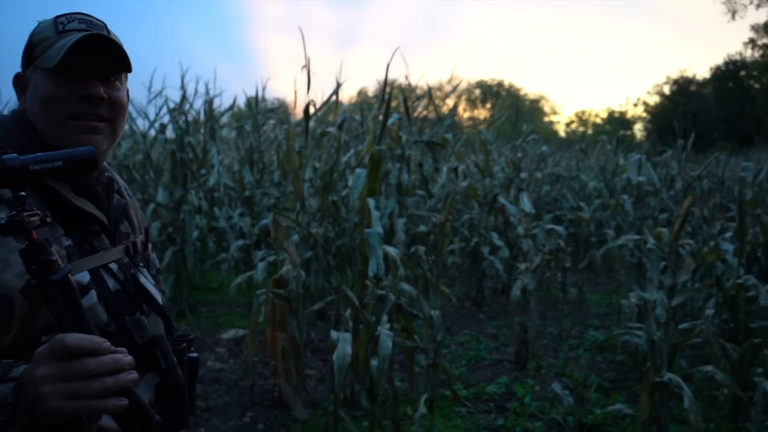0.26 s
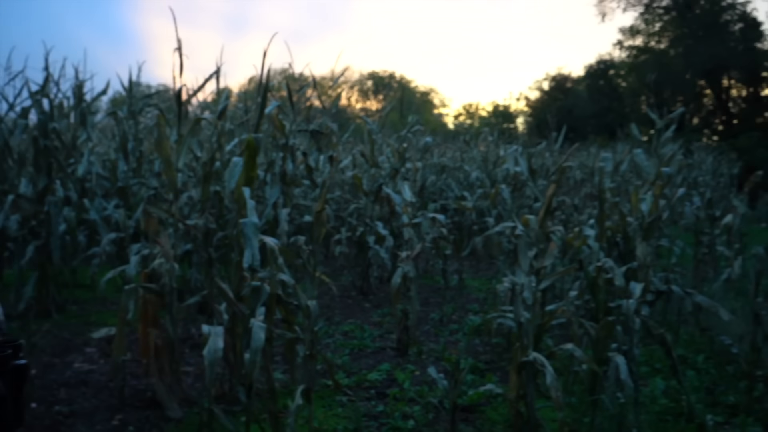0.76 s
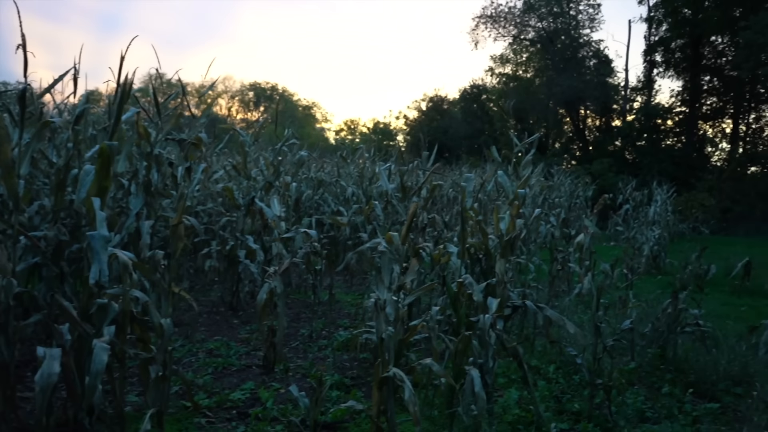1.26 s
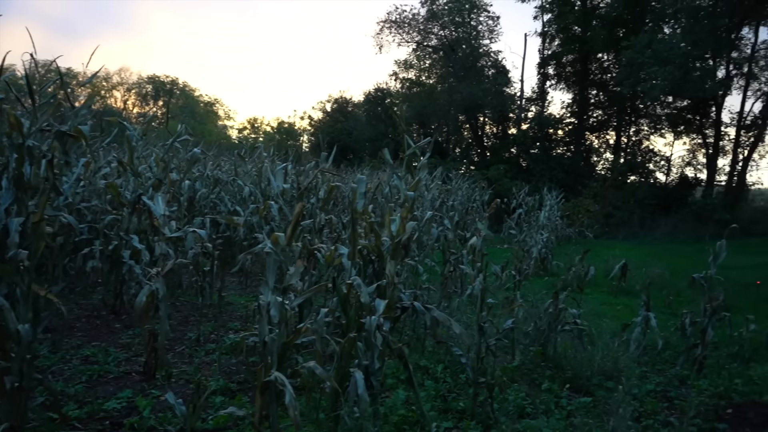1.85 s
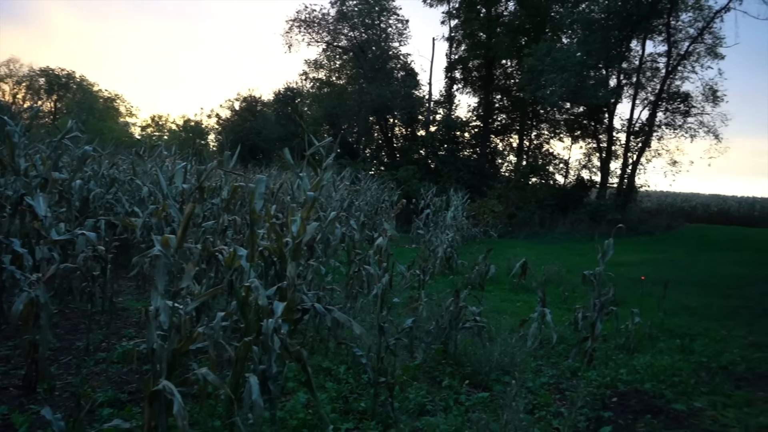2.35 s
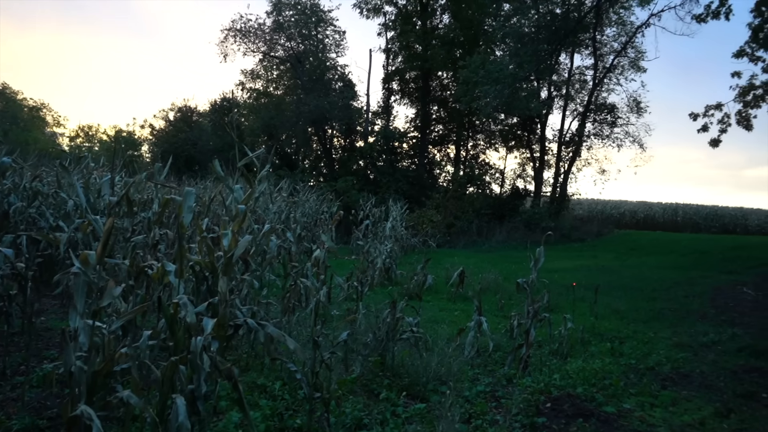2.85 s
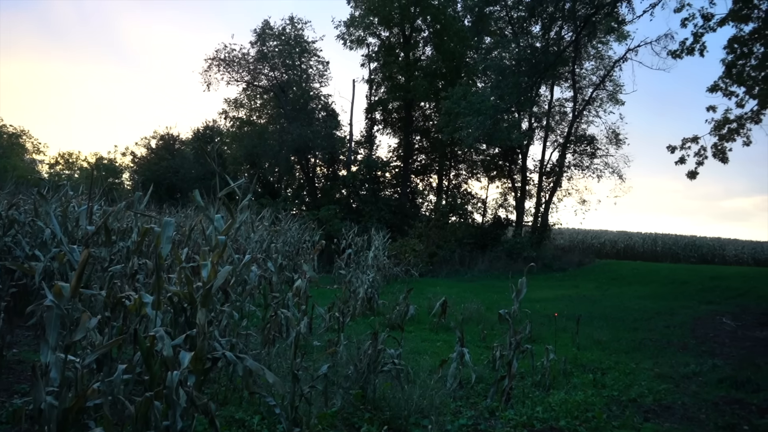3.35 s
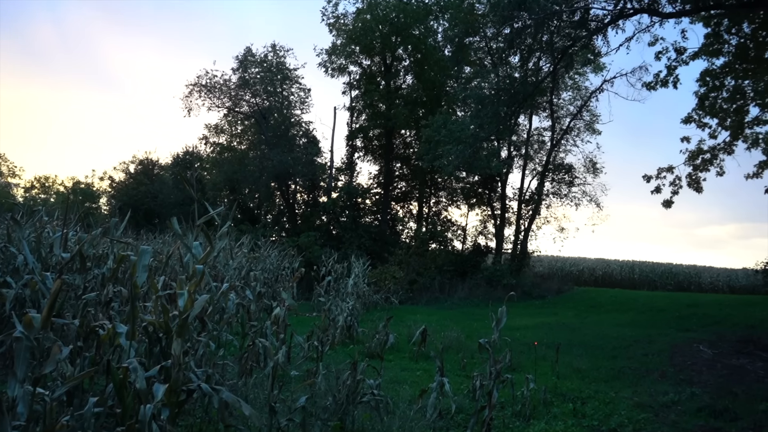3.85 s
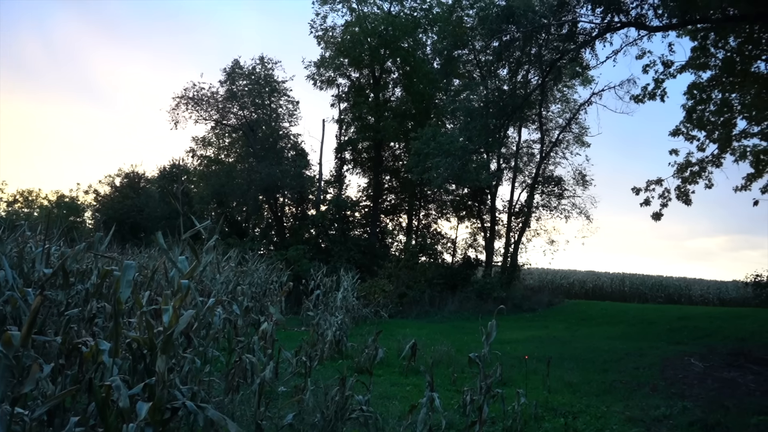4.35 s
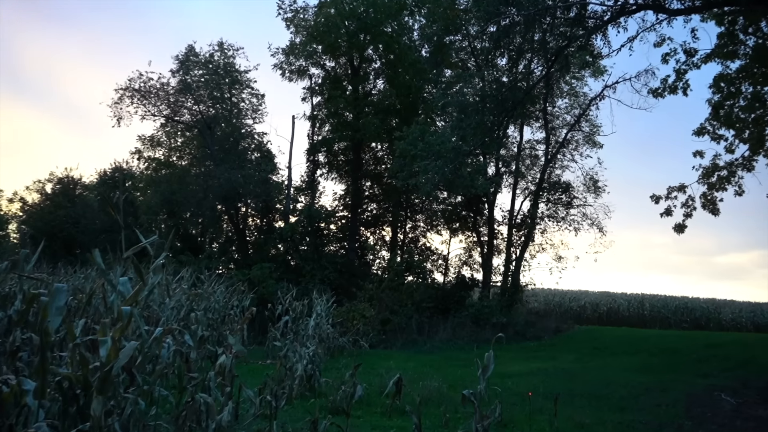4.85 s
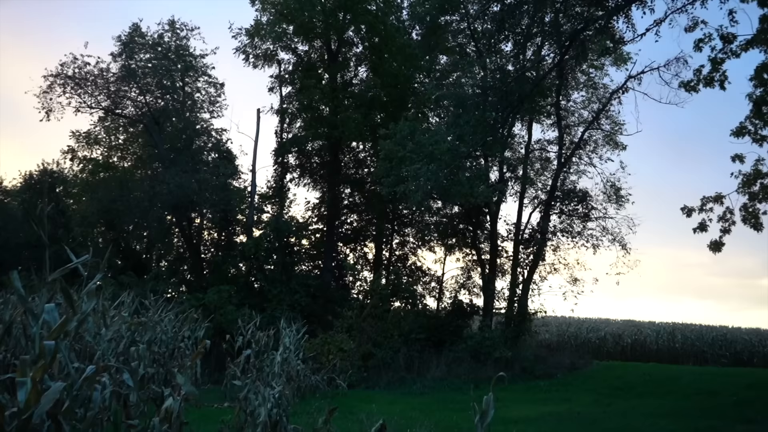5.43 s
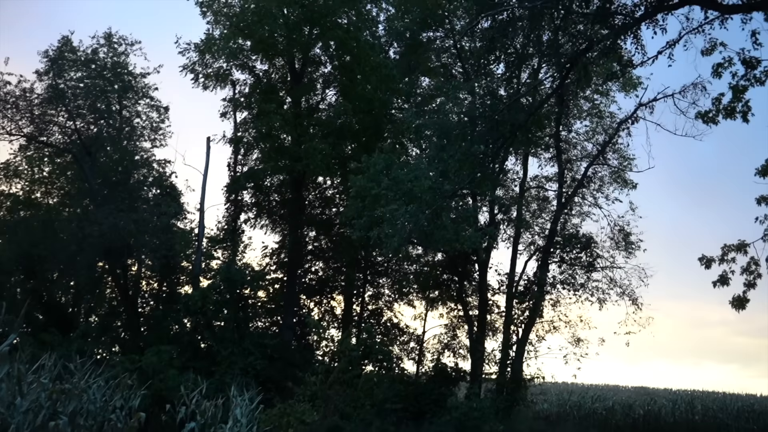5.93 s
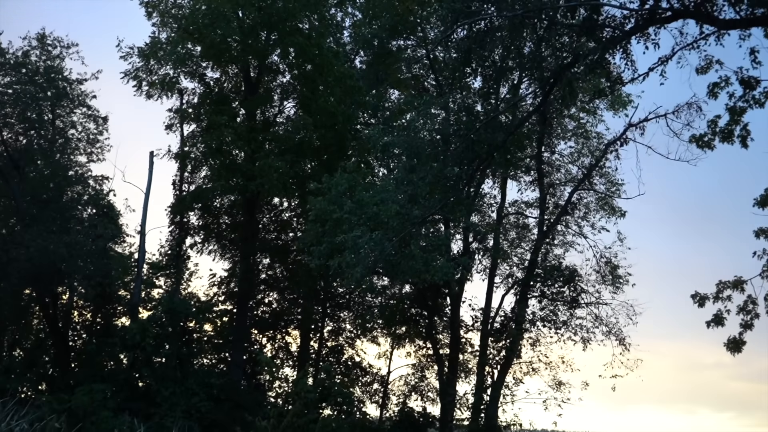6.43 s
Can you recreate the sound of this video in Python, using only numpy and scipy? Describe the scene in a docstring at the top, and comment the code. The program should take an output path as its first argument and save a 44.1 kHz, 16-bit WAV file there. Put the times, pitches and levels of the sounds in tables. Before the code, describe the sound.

Tree crickets trill steadily over an open-field hush while dry corn leaves crackle and a hand rubs and softly knocks the camera.

```python
"""The edge of a dry cornfield at dusk, heard at one microphone on a hand-held camera.
Near tree crickets trill together over a far chorus, one short falling tone per wing stroke.
Underneath lie the wash of open land, a far road and a machine hum, all shaped from noise.
At the microphone the hand sways, rubs and softly knocks the camera; carried gear taps twice.
Dry leaves crackle and snap in bursts of filtered noise; a bird calls thinly in gliding sines."""
import sys
import numpy as np
from scipy import signal
from scipy.fft import rfft, irfft
from scipy.io import wavfile
from scipy.ndimage import uniform_filter1d

SR = 44100
rng = np.random.default_rng(int(sys.argv[2]) if len(sys.argv) > 2 else 0)


def bounce(signal):
    """Save signal as a 16-bit WAV file at the path given by the first command-line argument."""
    frames = np.transpose(np.atleast_2d(signal))
    limited = np.clip(frames, -1, 1)
    pcm = np.round(limited * 32767).astype(np.int16)
    wavfile.write(sys.argv[1], SR, pcm)


N = 294940
T = np.arange(N) / SR  # time [s]


def undb(db):
    """Decibels to amplitude gain."""
    return 10 ** (np.asarray(db) / 20)


def unit(x):
    """Scale to rms 1."""
    return x / np.sqrt(np.mean(x ** 2) + 1e-20)


def frequencies(x):
    """Frequencies [Hz] of the real spectrum of x."""
    return np.arange(len(x) // 2 + 1) * SR / len(x)


def colour(x, points):
    """Filter by a spectrum of (frequency [Hz], level [dB]) that falls away beyond both ends; rms 1."""
    hz, db = np.transpose(points)
    f = frequencies(x)
    gain = undb(np.interp(np.log(f + 1), np.log(hz), db))
    low_skirt = np.minimum(f / hz[0], 1) ** 2
    high_skirt = np.maximum(f / hz[-1], 1) ** 2
    return unit(irfft(rfft(x) * gain * low_skirt / high_skirt, len(x)))


def band(x, hz, octaves):
    """One broad resonance, bell-shaped on the octave scale; rms 1."""
    distance = np.log2((frequencies(x) + 1) / hz) / octaves
    return unit(irfft(rfft(x) / (1 + (distance / 2) ** 2) ** 4, len(x)))


def noise():
    """White noise for the whole scene."""
    return rng.standard_normal(N)


def walk(rate):
    """Slow random wander: levels held for 1 / rate seconds, then smoothed twice over that time."""
    hold = max(int(SR / rate), 1)
    steps = np.repeat(rng.standard_normal(N // hold + 1), hold)
    smooth = uniform_filter1d(uniform_filter1d(steps, hold), hold)
    return 1.3 * smooth[:N]


def tone(hz):
    """A sine of rms 1 that follows a pitch curve [Hz]."""
    return np.sqrt(2) * np.sin(2 * np.pi * np.cumsum(hz) / SR)


def add(out, s, db, x):
    """Mix a short sound in at time s [s] with the given peak level [dB]."""
    i = int(s * SR)
    out[i:i + len(x)] += (undb(db) * x / np.abs(x).max())[:N - i]


def ring(modes, ratio=1):
    """Free ringing of a struck object as decaying sines; a lower ratio rings deeper and longer."""
    t = T[:SR // 4] * ratio
    return sum(undb(db) * np.sin(2 * np.pi * hz * t) * np.exp(-np.log(1000) * t / t60)
               for hz, db, t60 in modes)


def cricket(rate, at, hz, stroke=0.17, fall=0.041, slip=0.59, uneven_db=1.5, wander_hz=2.455):
    """Each closing stroke rings the wings afresh; the tone sags as the scraper slows."""
    cycle = (T - at) * rate
    number = np.round(cycle)
    phase = cycle - number  # -0.5 to 0.5 around the middle of each stroke
    # every stroke has its own loudness and its own starting phase (slip [rad])
    size, offset = rng.standard_normal((N // 1000, 2))[number.astype(int)].T
    falling = hz / rate * (phase - fall * phase ** 2)
    wander = np.cumsum(wander_hz * walk(6)) / SR
    swell = np.exp(-.5 * (phase / stroke) ** 2) * np.abs(np.cos(np.pi * phase)) ** .5
    return unit(swell * undb(uneven_db * size) * np.sin(2 * np.pi * (falling + wander) + slip * offset))


# near singers, the loudest one first, the others in no order of level:
# (stroke rate [1/s], time of one stroke [s], pitch [Hz], mean level [dB], time it starts to fade in [s])
NEAR_SINGERS = [(24.17, .036, 1872, -44.3, -2), (22.3, 0.003, 1850, -53, -2),
                (24.25, .025, 1752, -54.5, -2), (22.65, .01, 2038, -52.5, 1.6), (25.4, .02, 2115, -57, 2.6)]
FADE_IN_S = 1.16


def crickets(scatter_db=-7.0, scatter_s=0.058, chorus_db=-49.5, chorus_hz=1945, chorus_octaves=0.1):
    """Near singers, their sound scattered by stalks and trees, and the blur of many far ones."""
    near = 0
    for rate, at, hz, db, joins in NEAR_SINGERS:
        fade_in = np.clip((T - joins) / FADE_IN_S, 0, 1)
        near = near + cricket(rate, at, hz) * undb(db + 1.1 * walk(3.27)) * fade_in
    t = T[:SR // 2]
    echoes = rng.standard_normal(len(t)) * np.exp(-t / scatter_s)
    scattered = unit(signal.fftconvolve(near, echoes)[:N]) * near.std()
    chorus = band(noise(), chorus_hz, chorus_octaves)
    return near + undb(scatter_db) * scattered + undb(chorus_db) * chorus


# spectrum of the wash over open land: (frequency [Hz], relative density [dB per Hz])
OPEN_LAND = [(60, -22), (130, -4.5), (200, -1), (330, -4), (460, -3), (700, -3.5), (1150, -2), (1600, -3),
             (2500, -5), (3600, -5), (4500, -13.5), (5300, -12.5), (9500, -25), (12000, -26.5),
             (15500, -34)]


def field(air_db=-43, road_db=-48.5, road_hz=868, road_octaves=0.22,
          hum_db=-57, hum_hz=349, hum_octaves=0.026):
    """Steady wash of the open land, tyres on a far road and a machine hum of narrow, wavering noise."""
    air = colour(noise(), OPEN_LAND) * undb(air_db + 0.32 * walk(5.25))
    road = band(noise(), road_hz, road_octaves) * undb(road_db + 1.2 * walk(6))
    hum = band(noise(), hum_hz, hum_octaves) * undb(hum_db)
    return air + road + hum


# spectra at the microphone of the hand's sway and of the rubbed grip:
# (frequency [Hz], relative density [dB per Hz])
SWAY_SPECTRUM = [(4, -21), (9, -13), (13, 10), (16, 4), (21, -7.5), (27, -12), (36, -41), (60, -72)]
GRIP_SPECTRUM = [(22, -14), (35, -2.5), (53, -4), (75, -6.5), (100, -15), (170, -21), (330, -19),
                 (480, -34), (900, -41)]
SWAY_REST_DB, GRIP_REST_DB = -24, -43  # the hand between shifts
# the hand shifts its hold: (middle time [s], length [s], sway level [dB], grip rubbing level [dB])
HOLD_SHIFTS = [(0.0, 0.11, -17, -34), (2.72, 0.048, -21, -40), (2.892, 0.073, -9.5, -31.5),
               (4.01, .1, -32, -39), (4.167, 0.4, -17.5, -55), (4.6, .08, -38, -36.5),
               (4.841, .12, -23.5, -41), (5.09, 0.092, -17.5, -58), (5.233, .04, -35, -41),
               (5.66, 0.26, -23, -37), (6.077, 0.24, -14.5, -51), (6.69, 0.026, -19, -25.5)]


def handling():
    """The hand sways and rubs the housing, more at each shift of its hold."""
    sway_gain, grip_gain = undb(SWAY_REST_DB), undb(GRIP_REST_DB)
    for at, length, sway_db, grip_db in HOLD_SHIFTS:
        swell = np.exp(-2 * ((T - at) / length) ** 2)
        sway_gain = np.hypot(sway_gain, swell * undb(sway_db))
        grip_gain = np.hypot(grip_gain, swell * undb(grip_db))
    sway = colour(noise(), SWAY_SPECTRUM)
    sway = sway / np.sqrt(uniform_filter1d(sway ** 2, SR // 5))  # the hand never quite rests
    return sway * sway_gain + colour(noise(), GRIP_SPECTRUM) * grip_gain


# soft knocks on the camera body, right at the microphone:
# (time [s], peak level [dB], contact time [ms], pitch as a ratio of the body's modes)
BODY_KNOCKS = [(1.335, -21, 2.2, 1.16), (2.372, -30, 2.6, 1.56), (2.886, -19, 2.9, 0.98),
               (2.893, -10, 3.6, 0.97), (3.004, -27.5, 2, 1.15), (3.96, -21, 20, 0.29),
               (4.155, -20, 14.8, 0.326), (5.60, -24, 15, 0.36), (5.688, -27, 2, 1.42),
               (5.73, -21.5, 16, 0.36)]
# modes of the camera body, a plastic part and a small buckle:
# (frequency [Hz], relative level [dB], time to fall 60 dB [s])
BODY_MODES = [(157.6, -5.5, 0.071), (174.5, -0.5, 0.04), (340, 1.5, 0.022)]
PLASTIC_MODES = [(420, -28, 0.018), (900, -7, 0.052), (1180, 8.5, 0.0061), (1490, 1, 0.0045),
                 (2790, -1, 0.0044), (3600, -24, .004)]
BUCKLE_MODES = [(2740, -2, 0.056), (4180, -11, 0.0074), (5120, 5.5, 0.018), (5830, -4, 0.027),
                (7040, -5, 0.009), (8200, -14, 0.0083), (11220, -23, .01)]
# one hard tap of each piece of carried gear: (time [s], peak level [dB])
PLASTIC_TAP, BUCKLE_TAP = (.6698, -9.5), (3.621, -19)


def knocks():
    """Soft contacts push the camera body into ringing; a plastic part and a buckle each ring once."""
    out = np.zeros(N)
    for at, db, contact_ms, ratio in BODY_KNOCKS:
        push = signal.windows.hann(int(contact_ms * SR / 1000) + 3)  # longer contact, duller knock
        add(out, at, db, np.convolve(ring(BODY_MODES, ratio), push))
    add(out, *PLASTIC_TAP, ring(PLASTIC_MODES))
    add(out, *BUCKLE_TAP, ring(BUCKLE_MODES))
    return out


# start and end of the camera's turn away from the corn: time [s]
TURN_TIMES = [3, 5.5]
LATE_DB = -4  # level of rustle and random ticks after the turn, relative to before


def turned_away(s):
    """Level change [dB] at time s [s] as the camera turns from the corn."""
    return np.interp(s, TURN_TIMES, [0, LATE_DB])


# crackle of large to small leaves: (centre frequency [Hz], relative level [dB])
LEAF_BANDS = [(1400, -27), (2800, 11.5), (3800, 11.5), (5500, 5), (11000, 0)]


def rustle(level_db=-51.0, per_s=90, spread_db=2.5, swell_db=1.3):
    """Dry leaves crackle finely: random tiny breaks, each a decaying burst of noise."""
    decay = np.exp(-T[:SR // 20] / 0.0011)
    out = 0
    for hz, db in LEAF_BANDS:
        strength = undb(spread_db * np.minimum(rng.exponential(size=N), 3))
        breaks = (rng.random(N) < per_s / SR) * strength
        bursts = noise() * signal.fftconvolve(breaks, decay)[:N]
        out = out + undb(db) * band(bursts, hz, 0.7)
    return unit(out) * undb(level_db + swell_db * walk(6.2) + turned_away(T))


# the louder snaps of dry leaves and stalks:
# (time [s], peak level of the flutter [dB], centre frequency [Hz])
LOUD_SNAPS = [(.322, -27, 1590), (.428, -28, 3880), (.711, -25.5, 2980), (0.817, -28, 4870),
              (0.888, -25, 2100), (1.023, -21.5, 2370), (1.042, -26.5, 3700), (1.504, -26.5, 3500),
              (1.619, -20, 3550), (1.658, -29, 3160), (1.710, -25, 3900), (2.139, -28, 3960),
              (2.150, -27.5, 3100), (2.470, -29, 4000), (2.555, -31, 1300), (3.257, -25.5, 4270),
              (3.570, -28, 4530), (4.426, -28, 4470), (4.529, -25.5, 950), (4.626, -31, 910),
              (5.079, -32, 2980), (5.144, -29.5, 890), (6.069, -25.5, 3480)]
# faint ticks at random times: peak level before the turn, middle pitch, scatter of the pitch
TICK_DB, TICK_HZ, TICK_SCATTER = -34.5, 4900, 0.51  # scatter [octaves] times a draw from -2 to 2
SNAP_OCTAVES = 0.59  # bandwidth setting of the flutter in snaps and ticks


def snaps(snap_s=0.0011, settle_db=-17, settle_s=0.014, crack_db=-14, crack_hz=6000, crack_s=0.00029):
    """The fibre parts with a bright crack, then the leaf flutters in its own range."""
    ticks = [(s, TICK_DB + turned_away(s), TICK_HZ * 2 ** (TICK_SCATTER * pitch))
             for s, pitch in rng.uniform([.1, -2], [T[-1], 2], size=(26, 2))]
    t = T[:SR // 20]
    crack_decay = np.exp(-t / crack_s)
    flutter_decay = np.exp(-t / snap_s) + undb(settle_db) * np.exp(-t / settle_s)
    lead = SR // 200  # silence ahead of the burst leaves room for the filter's spread
    out = np.zeros(N)
    for s, db, hz in LOUD_SNAPS + ticks:
        bursts = rng.standard_normal((2, len(t))) * [crack_decay, flutter_decay]
        crack, flutter = np.pad(bursts, ((0, 0), (lead, 0)))
        add(out, s - lead / SR, db + crack_db, band(crack, crack_hz, 4.6))
        add(out, s - lead / SR, db, band(flutter, hz, SNAP_OCTAVES))
    return out


# notes of the small bird, each dipping from its first pitch and lifting a little:
# (time [s], length [s], first pitch [Hz], lowest pitch [Hz], mean level before the note's swell [dB])
CALL_NOTES = [(3.25, 0.13, 8450, 7780, -58), (3.265, .075, 7500, 7030, -57),
              (3.409, .155, 7300, 6920, -53.5)]
BIRD_DIP = 0.61  # share of a note at which its pitch is lowest


def bird(waver=0.01, flicker_db=2):
    """A thin, wavering call: every note swells, dips in pitch and fades; the first two overlap."""
    out = 0
    for s, length, first_hz, low_hz, db in CALL_NOTES:
        along = np.clip((T - s) / length, 0, 1)
        glide = low_hz + (first_hz - low_hz) * (1 - along / BIRD_DIP) ** 2
        pitch = glide * (1 + waver * walk(500))
        swell = np.abs(np.sin(np.pi * along))
        out = out + tone(pitch) * swell * undb(db + flicker_db * walk(90))
    return out


def scene():
    """Everything at one microphone."""
    land = crickets() + field()
    camera = handling() + knocks()
    leaves = rustle() + snaps()
    return (land + camera + leaves + bird())[None]


TOP_HZ = 15800


def record(dry):
    """The recorder cuts the top with a steep low-pass."""
    low_pass = signal.ellip(10, .1, 80, TOP_HZ, fs=SR, output="sos")
    return signal.sosfilt(low_pass, dry)


dry = scene()
out = record(dry)
bounce(out)
```